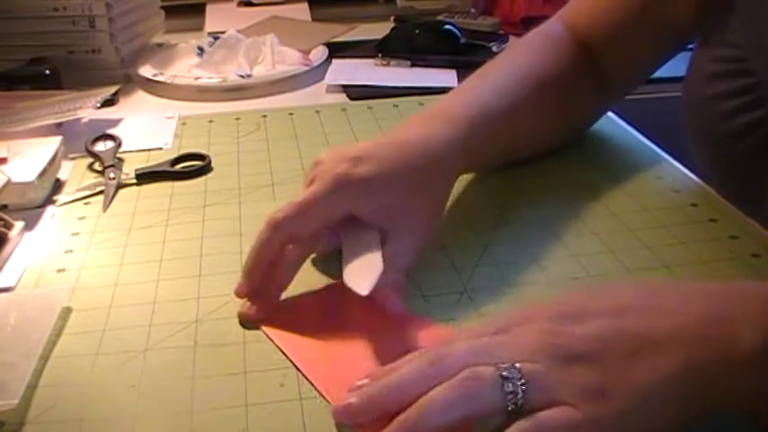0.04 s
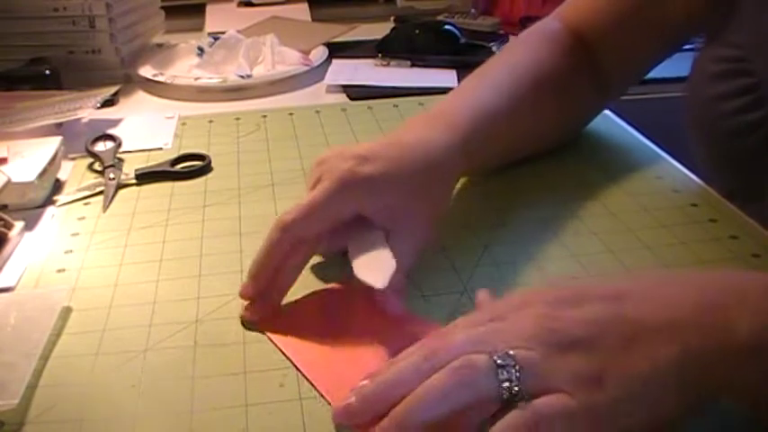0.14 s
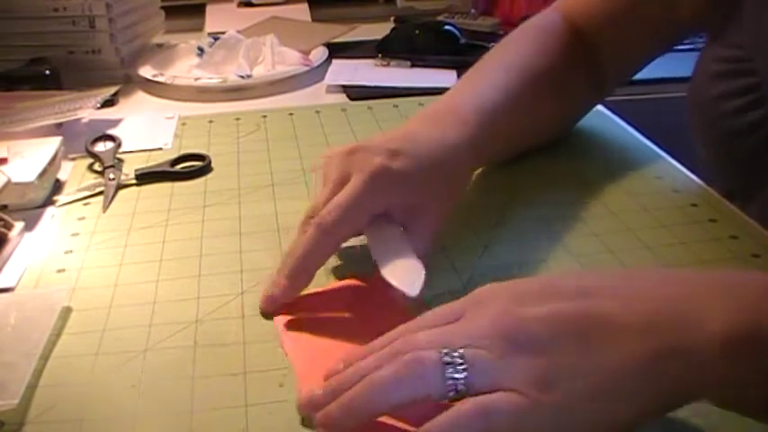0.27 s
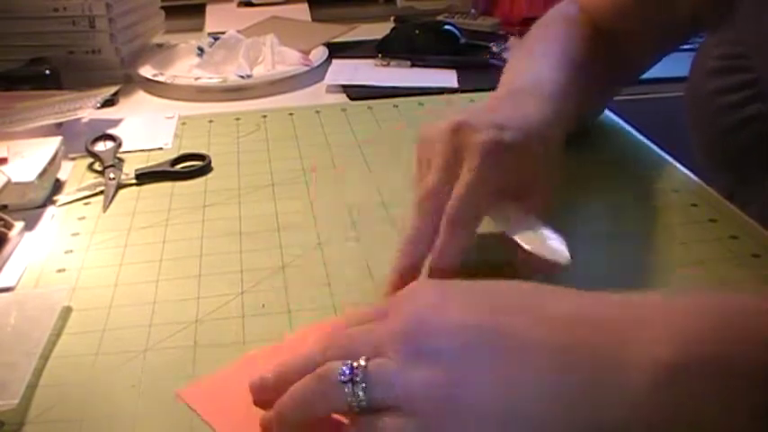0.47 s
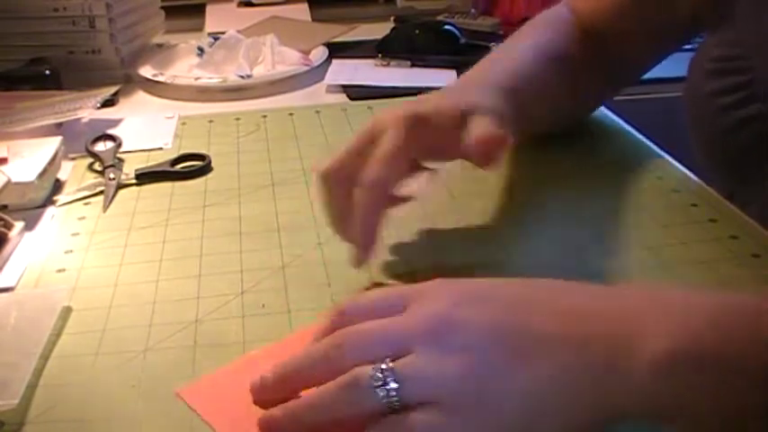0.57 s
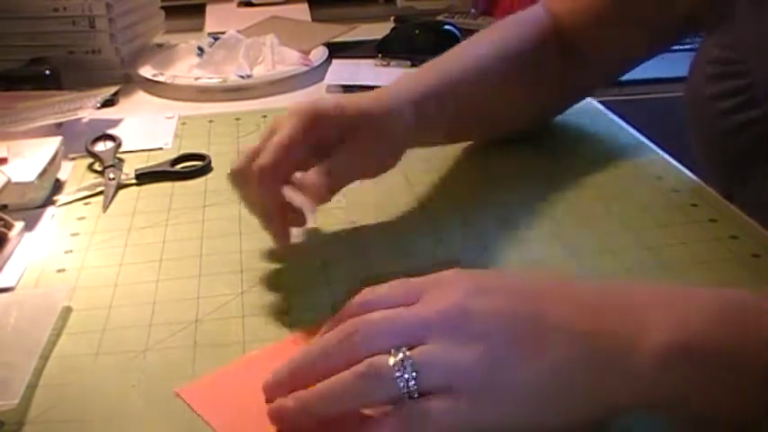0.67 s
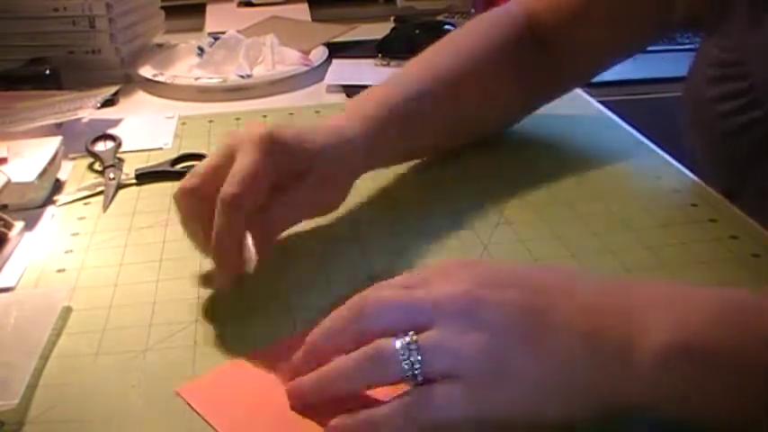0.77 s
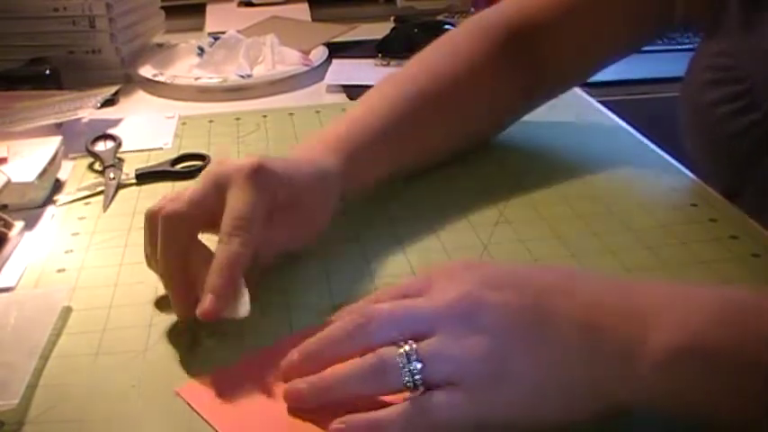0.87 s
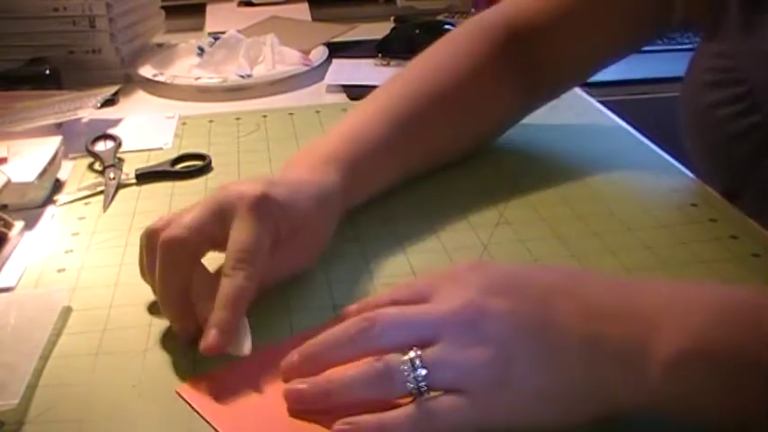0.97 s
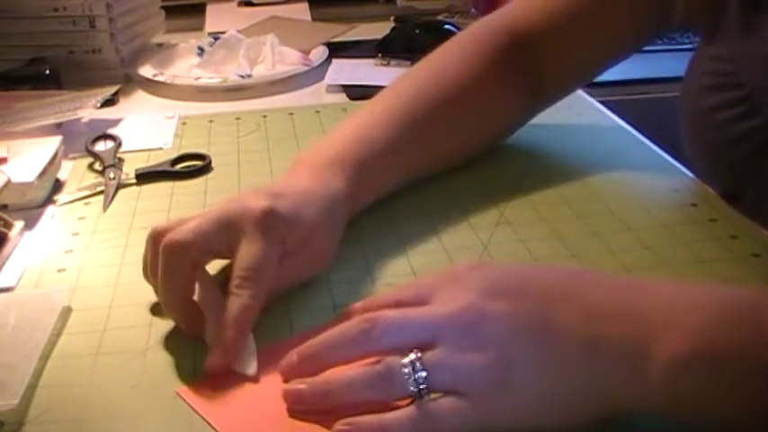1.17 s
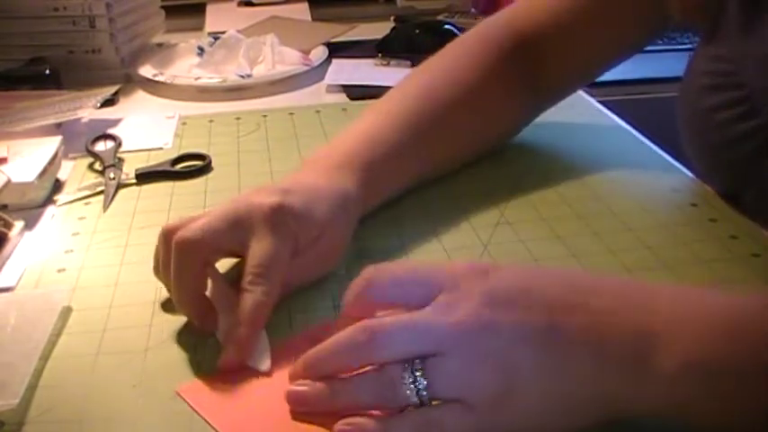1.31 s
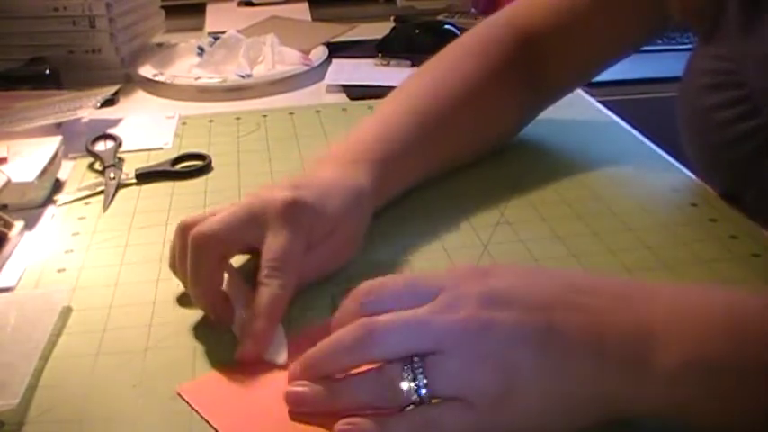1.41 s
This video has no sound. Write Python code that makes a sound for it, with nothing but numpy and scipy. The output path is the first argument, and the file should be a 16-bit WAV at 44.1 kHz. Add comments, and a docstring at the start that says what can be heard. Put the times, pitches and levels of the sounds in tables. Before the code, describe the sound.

A folding tool rubs firmly along a cardstock crease, then ticks, a tap and faint creaks over hum

```python
"""Mains hum and room noise lie under the whole scene, and narrow bands of noise sing for a moment here and there.
A tool and fingers slide over card on a work mat: first one firm stroke, built from grains of friction over hiss.
A tick of the card edge and a thud on the mat follow, then light brushes with more ticks and one more thud.
Near the end a joint of the table creaks: small slips strike its ringing tones.
A small stereo microphone listens close by, so the room adds only a quiet, short tail."""
import sys
import numpy as np
from scipy import signal
from scipy.io import wavfile

SR = 44100
rng = np.random.default_rng(int(sys.argv[2]) if len(sys.argv) > 2 else 0)


def invert_db(level):
    """Linear amplitude ratio for a level in decibels (20 dB per decade), elementwise."""
    return 10 ** (np.asarray(level, dtype=float) / 20)


def master_out(mix):
    """Clip the mix to full scale and print it as 16-bit PCM to the path in sys.argv[1]."""
    frames = np.transpose(np.atleast_2d(mix))
    ceiling = np.clip(frames, -1, 1)
    pcm = np.round(ceiling * 32767).astype(np.int16)
    wavfile.write(sys.argv[1], SR, pcm)


N = 63945  # length of the scene in samples
LEFT_RIGHT = np.array([[1], [-1]])  # opposite sign in the two channels


def rms_one(x):
    """Scales a signal to an rms of 1."""
    return x / np.sqrt(np.mean(x ** 2) + 1e-20)


def at_hz(points, hz):
    """Reads a curve of (Hz, value) at one frequency, on a logarithmic frequency axis."""
    table_hz, value = np.array(points).T[:2]
    return np.interp(np.log(hz), np.log(table_hz), value)


def drift(rate_hz):
    """Slow random wandering of rms 1: noise smoothed twice; a higher rate wanders faster."""
    hop = 40  # samples between the points
    r = np.exp(-2 * np.pi * rate_hz * hop / SR)
    noise = rng.standard_normal(N // hop + 2002)
    slow = signal.lfilter([1], [1, -2 * r, r * r], noise)[2000:]  # skip the settling
    return np.interp(np.arange(N) / hop, np.arange(len(slow)), rms_one(slow))


def ring(clicks, hz, t60_s):
    """A dying tone: a unit click sets a sine of height 1 ringing, which falls 60 dB in t60_s."""
    r = invert_db(-60 / (t60_s * SR))
    w = 2 * np.pi * hz / SR
    return signal.lfilter([0, np.sin(w)], [1, -2 * r * np.cos(w), r * r], clicks + 1e-18)


def resonance(x, hz, width_hz):
    """Passes a narrow band around hz, with a gain of about 1 at its top."""
    r = np.exp(-np.pi * width_hz / SR)
    bottom = [1, -2 * r * np.cos(2 * np.pi * hz / SR), r * r]
    return signal.lfilter(np.array([1, 0, -1]) * (1 - r * r) / 2, bottom, x)


def stereo_bands(source, spectrum, likeness, low_hz, patchy_db, rate_hz):
    """Cuts noise into third-octave bands that waver in level; yields each centre in Hz and its stereo band."""
    edges = low_hz * 2 ** np.arange(0, np.log2(17000 / low_hz), 1 / 3)
    for k, (low, high) in enumerate(zip(edges, edges[1:])):
        band_pass = signal.butter(2, [low, high], "band", fs=SR, output="sos")
        # neighbouring bands take turns between two separate (mid, side) noises
        mid, side = signal.sosfilt(band_pass, source[k % 2])
        hz = np.sqrt(low * high)
        alike = np.clip(at_hz(likeness, hz), -1, 1)
        gain = invert_db(at_hz(spectrum, hz) + patchy_db * drift(rate_hz))
        yield hz, gain * (np.sqrt(1 + alike) * mid + np.sqrt(1 - alike) * side * LEFT_RIGHT)


# colour of the room noise: (frequency [Hz], relative density [dB per Hz])
ROOM_NOISE_COLOUR = [(15, -32), (25, -6.5), (152, -7.5), (246, -1), (421, -6.5), (631, -12), (945, -5),
                     (2120, -13.5), (2360, -19), (3720, -25), (4620, -21), (6210, -32), (8580, -27),
                     (10600, -33), (15500, -51)]
# how alike left and right are in the room noise: (frequency [Hz], likeness [-1 to 1])
ROOM_NOISE_LIKENESS = [(60, 0.3), (150, 0.44), (380, 0.28), (950, 0.59), (2380, 0.45), (5980, 0.3),
                       (15000, 0.41)]


def room_noise():
    """Steady noise of the room, shaped band by band and only partly alike in the two channels."""
    level_db = -49.5  # rms
    noise = rng.standard_normal((2, 2, N))
    bands = stereo_bands(noise, ROOM_NOISE_COLOUR, ROOM_NOISE_LIKENESS, 25.5, patchy_db=0.35, rate_hz=2.8)
    return invert_db(level_db) * rms_one(sum(band for hz, band in bands))


# mains hum, one entry for each multiple 1, 2, 3 .. of the mains frequency: usual level [dB rms]
HUM_LEVELS = [-60.5, -47, -52, -59, -52, -59, -61.5, -67, -83, -71.5, -76, -68, -85, -65, -66]


def hum():
    """Sines at multiples of the mains frequency, each wavering a little in level."""
    mains_hz, waver_db, waver_hz = 60, 0.5, 6.6
    turn = 2 * np.pi * mains_hz * np.arange(N) / SR
    out = np.zeros(N)
    for k, level_db in enumerate(HUM_LEVELS, 1):
        height = np.sqrt(2) * invert_db(level_db + waver_db * drift(waver_hz))
        # the phases [radians] are spread so that the wave is not peaky
        out += height * np.sin(k * turn + 0.6 * k * k)
    return out


# noise bands that sing for a moment:
# (start time [s], end time [s], frequency [Hz], width [Hz], level at full swell [dB rms])
SINGING_BANDS = [(-.02, 0.197, 270, 119, -52.5), (1.18, 1.301, 1500, 600, -53.5),
                 (-.04, .21, 6630, 90, -60.5), (0.186, 0.303, 1365, 307, -49.5),
                 (0.352, 0.475, 1030, 154, -48.5), (.44, 0.497, 900, 98, -49.5), (.52, .63, 877, 99, -56),
                 (0.543, .572, 4540, 400, -44), (0.715, 0.76, 1620, 300, -58.5)]


def singing_bands():
    """Noise sent twice through a narrow resonance, swelling and fading."""
    t = np.arange(N) / SR
    out = np.zeros(N)
    for start, end, hz, width_hz, level_db in SINGING_BANDS:
        progress = np.clip((t - start) / (end - start), 0, 1)
        swell = np.clip(3.6 * np.sin(np.pi * progress), 0, 1)  # flat on top
        narrow = resonance(rng.standard_normal(N), hz, width_hz)
        narrow = resonance(narrow, hz, width_hz)
        out += invert_db(level_db) * swell * rms_one(narrow)
    return out


# tool or fingertip lands on the mat: (time [s], strength [dB], tilt around 1 kHz [dB per octave])
LANDINGS = [(.532, -33, 5), (0.8719, -40.5, 1)]
# ringing tones of the mat: (frequency [Hz], relative level [dB], time to fall 60 dB [s])
MAT_TONES = [(270, 1, 0.095), (600, -13, .04), (900, -8, 0.064), (1590, -7.5, 0.024), (2186, -3.5, 0.034),
             (2680, -9.5, 0.021)]


def thuds():
    """Each landing is a single click that sets the tones of the mat ringing."""
    out = np.zeros(N)
    for time, strength_db, tilt in LANDINGS:
        click = np.zeros(N)
        click[int(time * SR)] = 1
        for k, (hz, level_db, t60_s) in enumerate(MAT_TONES):
            gain = invert_db(strength_db + level_db + tilt * np.log2(hz / 1000))
            out += gain * ring(click, hz, t60_s) * (-1) ** k
    return out


# slips of a creaking joint: (time [s], strength [dB])
JOINT_SLIPS = [(1.0864, -37), (1.0914, -37), (1.0969, -33.5), (1.1034, -47), (1.1084, -36.5), (1.1214, -39),
               (1.1336, -43), (1.1992, -37.5), (1.2038, -52), (1.2167, -39), (1.2273, -42), (1.3294, -33.5),
               (1.3334, -42), (1.3434, -33.5), (1.3544, -35), (1.3614, -35), (1.3704, -39), (1.3774, -36),
               (1.3897, -49)]
# ringing tones of the joint: (frequency [Hz], relative level [dB], time to fall 60 dB [s])
JOINT_TONES = [(900, -13.5, 0.047), (1163, -5.5, 0.032), (1444, 2, 0.026), (1770, -7, .015),
               (2083, -5, 0.028), (2540, -15, .012), (3160, -14.5, 0.013), (4420, -22, .012)]


def creaks():
    """Each slip is a click with a short rough drag; together they strike the tones of the joint."""
    drag_db, drag_t60_s, chance_db = -22, 0.017, 1.3
    times, strength_db = np.transpose(JOINT_SLIPS)
    chance = rng.standard_normal((len(times), len(JOINT_TONES)))
    fade = invert_db(-60 / (drag_t60_s * SR))  # per sample
    rough = invert_db(drag_db) * rng.standard_normal(N)
    out = np.zeros(N)
    for k, (hz, level_db, t60_s) in enumerate(JOINT_TONES):
        clicks = np.zeros(N)
        clicks[(times * SR).astype(int)] = invert_db(strength_db + level_db + chance_db * chance[:, k])
        drag = rough * signal.lfilter([1], [1, -fade], clicks + 1e-18)
        out += ring(clicks + drag, hz, t60_s) * (-1) ** k
    return signal.lfilter([0.3], [1, -0.7], out)  # softens the creaks


# ticks of the card edge: (time [s], strength as a peak [dB], tilt [dB per octave],
# time constant of the rise [s], time to fall 60 dB [s])
EDGE_TICKS = [(.5328, -20.5, -6, 0.00077, 0.012), (0.8303, -43, -3, .0004, 0.019),
              (1.046, -44, -6, .0004, .014), (1.148, -33.5, 3, .0003, 0.014),
              (1.1503, -41, -3, .0004, 0.011), (1.2052, -36.5, 1, .0004, .008)]


def tick_bursts(t):
    """Short bursts that rise and die exponentially; returns the loudness curve and tilt of each tick."""
    crest_db = 10  # peak over rms
    bursts = []
    for time, peak_db, tilt, rise_s, t60_s in EDGE_TICKS:
        rise = np.exp(np.minimum(t - time, 0) / rise_s)
        fall = invert_db(-60 * np.maximum(t - time, 0) / t60_s)
        bursts.append((invert_db(peak_db - crest_db) * np.where(t < time, rise, fall), tilt))
    return bursts


def friction_noise():
    """Fibres catch and slip: noise made rough by dense grains of uneven strength, over smooth hiss."""
    grains_per_s, spread_db, smooth_db = 12000, 2.5, 6
    strength = invert_db(spread_db * np.minimum(rng.exponential(1, N), 5))
    grains = (rng.random(N) < grains_per_s / SR) * strength
    roughness = rms_one(grains) + invert_db(smooth_db)
    return rng.standard_normal((2, 2, N)) * roughness


# tool and fingers touching the card, in stretches of
# (time [s], level before the resonances [dB], tilt [dB per octave],
#  loss below the body edge [dB per octave, negative counts as 0])
CONTACT = [
    [(0.0, -50, -0.5, -1), (0.074, -55, 2, -2), (0.094, -45.5, 7.5, 2), (0.134, -56.5, -1.5, 2),
     (0.18, -52.5, 1, 0), (0.186, -41, -13, -4)],
    [(0.186, -39, -1.5, -1), (0.198, -36, -2, -8), (0.264, -32, -4, 7), (0.3, -26, -1.5, 2)],
    [(0.3, -27, -0.5, 9), (0.372, -20.5, 2, -5), (0.44, -31, -5.5, 6)],
    [(0.44, -35.5, -7.5, 14), (0.458, -28, -5, 15), (0.506, -58, -11.5, 14), (0.536, -35, -3.5, 15),
     (0.542, -42, -2, 0), (0.564, -35, 0, -3), (0.62, -56.5, -3.5, 5)],
    [(0.62, -58, 1, 2), (0.704, -45.5, 3, 2), (0.764, -49.5, -3.5, 4), (0.8, -69, -1.5, 2),
     (0.912, -45, 4.5, 2), (0.994, -57.5, -0.5, 2), (1.012, -66, -3, 2), (1.082, -68, -4, 4),
     (1.088, -62, -16, -1), (1.14, -78, -3, 2)],
    [(1.14, -71, 0, 2), (1.144, -64, -1, 2), (1.15, -52, -1, 2), (1.176, -67.5, -3, 2), (1.192, -64, -8, 2),
     (1.202, -58, -2.5, -1), (1.244, -43, 1, 0), (1.272, -54.5, -4.5, -3), (1.45, -53, -4.5, -2)],
]
# colour of the friction: (frequency [Hz], relative density [dB per Hz])
CARD_COLOUR = [(350, -53), (600, -26.5), (1490, -17), (1930, -12), (2130, -9), (2280, -7), (2610, -21),
               (2830, -6), (5220, -2.5), (5820, -5), (8520, -0.5), (12000, -12.5), (15500, -41)]
# resonances of the card: (frequency [Hz], width [Hz], lift [dB])
CARD_RESONANCES = [(1877, 70, 7), (2276, 33, 5.5), (2905, 89, 3.5), (3210, 52, 2.5), (4430, 150, 1.5),
                   (5310, 230, 2.5), (6200, 110, 1), (7700, 200, 2.5), (8330, 350, 4.5), (8930, 220, 4)]
# how alike left and right are in the friction: (frequency [Hz], likeness [-1 to 1])
FRICTION_LIKENESS = [(60, 0.95), (180, 0.97), (550, 0.89), (1650, 0.98), (4970, 0.98), (15000, 0.52)]
# stereo place of the friction: (frequency [Hz], left over right [dB])
FRICTION_PAN = [(1000, .5), (2400, -1), (4400, -1.5), (8000, 0), (14000, 1.5)]


def card():
    """Friction noise follows the sliding contact; the ticks are bursts of the same noise; the card resonates."""
    tilt_pivot_hz, body_edge_hz = 6000, 2200
    t = np.arange(N) / SR
    times, *columns = np.transpose(np.concatenate(CONTACT))
    level_db, tilt, loss = [np.interp(t, times, column) for column in columns]
    bursts = tick_bursts(t)
    bands = list(stereo_bands(friction_noise(), CARD_COLOUR, FRICTION_LIKENESS, 510, patchy_db=1.5, rate_hz=17))
    # levels count from the rms of the bands above 3 kHz
    reference = np.sqrt(np.mean(sum(band for hz, band in bands if hz > 3000) ** 2))
    out = np.zeros((2, N))
    for hz, band in bands:
        octaves = np.log2(hz / tilt_pivot_hz)
        octaves_below_edge = min(np.log2(hz / body_edge_hz), 0)
        slide = invert_db(level_db + tilt * octaves + np.maximum(loss, 0) * octaves_below_edge)
        ticks = sum(burst * invert_db(tick_tilt * octaves) for burst, tick_tilt in bursts)
        pan = invert_db(at_hz(FRICTION_PAN, hz) / 2 * LEFT_RIGHT)
        out += band * pan * (slide + ticks)
    lifts = sum((invert_db(lift_db) - 1) * resonance(out, hz, width_hz) for hz, width_hz, lift_db in CARD_RESONANCES)
    return (out + lifts) / reference


def room_tail(x):
    """Echoes of the room: a tail of dying noise, partly shared by the two channels."""
    t60_s, side_db, gap_s = 0.14, -7, 0.002
    t = np.arange(SR // 2) / SR
    mid, side = rng.standard_normal((2, len(t))) * invert_db(-60 * t / t60_s) * (t > gap_s)
    tail = mid + invert_db(side_db) * side * LEFT_RIGHT
    tail = tail / np.sqrt(np.sum(tail ** 2) / 2)
    return signal.fftconvolve(x[None], tail, axes=1)[:, :N]


def scene():
    """Adds all sources; only the near ones, not hum and room noise, get the room tail."""
    tail_db = -10
    near = singing_bands() + thuds() + creaks() + card()
    tail = invert_db(tail_db) * room_tail(near.mean(axis=0))
    return room_noise() + hum() + near + tail


def low_pass(x):
    """Removes everything above the highest recorded frequency."""
    return signal.sosfilt(signal.butter(12, 15760, fs=SR, output="sos"), x)


def record(dry):
    """The microphone loses the deepest bass, below about 34 Hz."""
    bass_cut = signal.butter(2, 34, "high", fs=SR, output="sos")
    mix = signal.sosfilt(bass_cut, dry)
    return low_pass(mix)


dry = scene()
out = record(dry)
master_out(out)
```